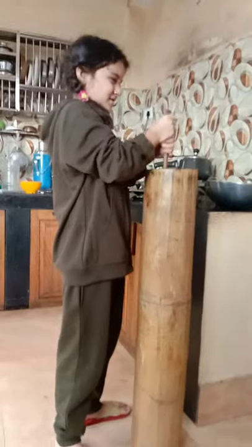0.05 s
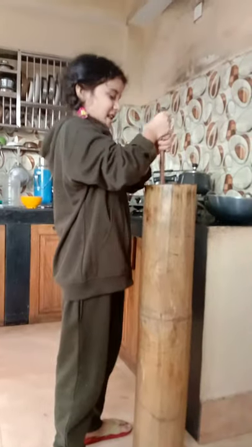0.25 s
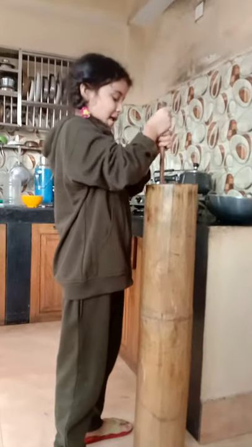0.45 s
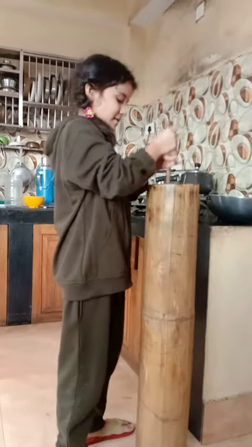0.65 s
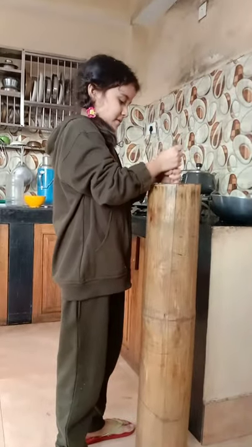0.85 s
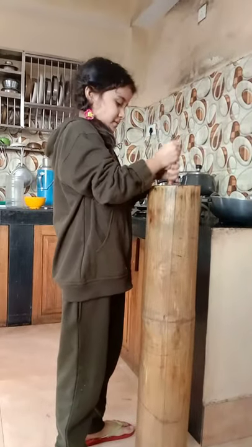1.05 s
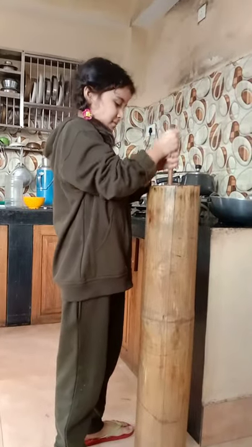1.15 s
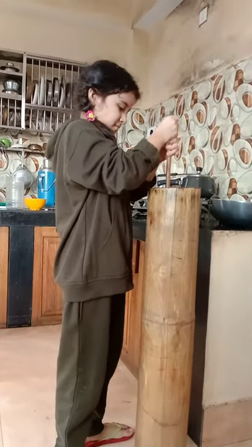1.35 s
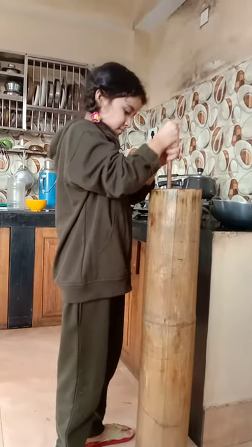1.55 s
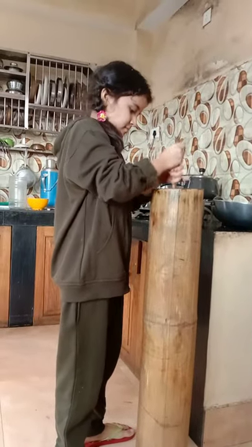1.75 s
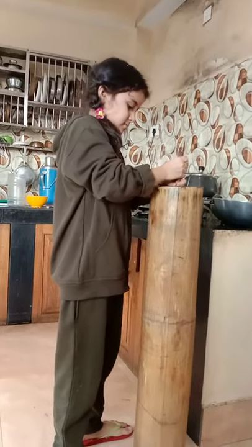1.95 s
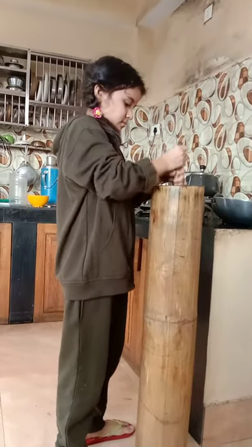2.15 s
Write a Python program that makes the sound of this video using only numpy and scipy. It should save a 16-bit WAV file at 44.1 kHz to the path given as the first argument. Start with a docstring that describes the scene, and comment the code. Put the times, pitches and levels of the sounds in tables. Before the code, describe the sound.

A wooden plunger churns liquid in a tall bamboo tube. Soft rubbing and gurgling lead to one loud, deep, hollow knock at 0.25 seconds, with a tiny rattle and wet slap. Much quieter gulps, fizzing bubbles and faint scrapes follow, with a soft low thud near 1.4 and a brief airy hoot with gurgling at 1.9. Quiet kitchen, slight echo, thin hiss, close microphone.

```python
"""In a quiet kitchen, a wooden plunger is worked up and down in a tall bamboo churn of liquid.
One strong knock with faint rattles excites damped wall modes, while decaying low sines make the liquid thump and gulp.
Random impulses through tube resonances gurgle and fizz; shaped impulses rub and scrape as the stick slides.
Near the end the air column hoots, an unsteady sagging sine. A faint room tail, still air and thin hiss
surround the churn."""
import sys
import numpy as np
from scipy import signal
from scipy.fft import rfft, irfft
from scipy.io import wavfile
from scipy.ndimage import uniform_filter1d

SR = 44100
rng = np.random.default_rng(int(sys.argv[2]) if len(sys.argv) > 2 else 0)


def dump_mix(stems):
    """Bounce the given channels to the path in sys.argv[1] as a 16-bit WAV at rate SR."""
    frames = np.atleast_2d(stems).T  # one column per channel
    limited = np.clip(frames, -1, 1)  # hard clip at full scale
    pcm = np.round(limited * 32767).astype(np.int16)
    wavfile.write(sys.argv[1], SR, pcm)


N = 97020
T = np.arange(N) / SR  # time in seconds

# Plunger striking and rattling on the tube. Each row: start in seconds, level in dB.
KNOCKS = [(0.243, 0.5), (.2566, -28), (.2717, -19.5), (0.2773, -21), (0.338, -24), (.496, -32)]
# Wall modes of the churn. Each row: frequency in Hz, level in dB relative to the knock, T60 in seconds.
CHURN_MODES = [(490, -50, 0.072), (595, -45.5, 0.077), (692, -49.5, .07), (832, -53.5, .05),
               (1170, -47, .025), (1300, -43.5, .09), (1420, -58, 0.067)]
# Air pockets forced past the plunger. Each row: start in seconds, pitch in Hz, peak level in dB,
# time to the peak in seconds.
GULPS = [(0, 80, -46, 0.0044), (0.126, 108.4, -54.5, .010), (0.2426, 138, -24.5, 0.0039),
         (.2517, 157.8, -22.5, 0.0072), (0.269, 152, -15.5, 0.0045), (.2705, 306, -26, 0.0058),
         (0.2775, 87.5, -16, 0.0061), (0.3305, 111.5, -49.5, .012), (0.378, 98, -40.5, .0068),
         (0.453, 88.5, -50.5, 0.013), (0.52, 85, -60.5, 0.0064), (0.6016, 123.4, -51.5, .010),
         (0.6564, 120.5, -56, 0.022), (.704, 100.4, -49, 0.01), (0.933, 74.6, -51, 0.0045),
         (1.001, 74, -45, 0.0094), (1.0359, 119.4, -49, 0.016), (1.3912, 80.5, -32, 0.005),
         (1.416, 72, -43, 0.0057), (1.539, 71.7, -58.5, 0.0075), (1.962, 117, -44.5, 0.018),
         (2.05, 79, -55.5, 0.011)]
# Small clear bubbles. Each row: start in seconds, initial pitch in Hz, peak level in dB.
BUBBLE_TONES = [(.125, 445, -50.5), (.207, 470, -49.5), (.355, 343, -46.5), (.430, 235, -52),
                (.660, 304, -59.5), (0.934, 316, -55.5), (0.954, 1054, -61.5), (1.026, 402, -53.5),
                (1.055, 415, -56.5), (1.275, 415, -54), (1.322, 490, -57), (1.403, 326, -47),
                (1.487, 292, -59.5), (1.848, 285, -58.5), (1.9075, 590, -52), (1.94, 595, -54)]
# Surges of liquid. Each row: time of the peak in seconds, rise time from 1/e of peak power in seconds,
# gurgle level in dB, froth level in dB.
SURGES = [(0.146, .022, -56.5, -75), (0.242, 0.034, -52.5, -71), (0.357, .036, -54, -69),
          (0.456, 0.01, -60, -68), (0.509, 0.021, -67, -74), (0.71, 0.028, -73, -74.5),
          (0.841, .040, -66, -73), (0.939, 0.048, -61.5, -69), (1.04, 0.043, -65, -72.5),
          (1.225, 0.028, -69, -74), (1.29, 0.017, -62.5, -78.5), (1.338, 0.017, -63, -72.5),
          (1.406, 0.033, -57.5, -67.5), (1.501, 0.041, -65, -80.5), (1.7, 0.057, -69, -77.5),
          (1.858, 0.019, -61, -74.5), (1.924, 0.0093, -51, -73.5), (1.974, 0.051, -58.5, -66.5),
          (2.11, 0.061, -75, -80)]
# Tube resonances under bubbles and froth. Each row: centre in Hz, width in Hz, relative level in dB.
GURGLE_MODES = [(220.6, 29, 4), (279.7, 18, 5), (350.4, 40, -1), (415, 22, -3), (485.6, 23, -2.5),
                (595, 10, -7)]
FROTH_MODES = [(1085, 60, -3), (1281, 45, 6), (1450, 110, -10), (1680, 390, -3.5), (2200, 500, -30)]
# Wall resonances under a scrape. Each row: centre in Hz, width in Hz, relative level in dB.
SCRAPE_MODES = [(1030, 50, -8), (1150, 35, -5), (1292, 35, 0), (1437, 40, -9)]
# Spectra of the splash's low slap, fine spray, rubbing, rolling liquid, room air and top hiss.
# Each row: frequency in Hz, relative level in dB.
SLAP_SPECTRUM = [(200, -24), (500, 6.5), (700, -1.5), (950, -7.5), (2000, -28.5), (4000, -44), (8000, -69)]
SPRAY_SPECTRUM = [(500, -2), (1000, 5.5), (2000, -10), (3000, -4), (4500, -4.5), (5600, -2), (6600, -33.5),
                  (15000, -25.5)]
RUB_SPECTRUM = [(100, -5.5), (400, 5.5), (900, 0.5), (1600, -1.5), (3000, -9.5), (4300, -14), (5600, -15),
                (6600, -26), (8000, -37), (15000, -21)]
SWIRL_SPECTRUM = [(20, -30), (40, -11.5), (60, 4), (90, -5), (122, 5), (155, -20.5), (280, -13.5),
                  (600, -22.5), (2000, -65.5)]
AIR_SPECTRUM = [(30, -3.5), (100, -4.5), (300, 1.5), (700, -12.5), (1300, -3.5), (2500, -17), (4300, -25.5),
                (5600, -23.5), (6500, -33), (8000, -37.5), (10000, -34.5), (13500, -32), (14800, -25),
                (16000, -16)]
HISS_SPECTRUM = [(5000, -35), (8000, -24), (10000, -10.5), (13600, -14.5), (14800, -0.5), (16000, 2)]
# Sliding of the stick. Each row: start in seconds, length in seconds, level in dB.
RUBS = [(0, .216, -66.5), (0.462, 0.043, -69), (0.786, .13, -72), (1.668, 0.16, -76.5)]
# Stick catching on the tube wall. Each row: start in seconds, decay time in seconds, level in dB.
SCRAPES = [(.2695, .016, -53.5), (.455, 0.011, -65), (.492, 0.044, -61), (1.196, .056, -68.5),
           (1.843, 0.066, -70.5), (1.945, 0.052, -69), (2.087, 0.033, -69.5)]
# Level courses of the rolling liquid and the top hiss. Each row: time in seconds, level in dB.
SWIRL_LEVEL = [(0, -55.5), (.05, -63.5), (.21, -57.5), (.34, -54), (.55, -69), (.63, -59.5), (.77, -62.5),
               (.86, -60), (.91, -66.5), (1.06, -56.5), (1.17, -69), (1.42, -62.5), (1.6, -65.5),
               (1.74, -64), (1.81, -77), (1.95, -59), (2.2, -69)]
HISS_LEVEL = [(0, -100), (.3, -79), (.42, -92), (.49, -78.5), (.6, -83.5), (.75, -88), (1.2, -104),
              (1.42, -84), (1.62, -104), (1.9, -102.5), (2.02, -79), (2.2, -100)]

TICK_DB, TICK_TOP_HZ, TICK_HZ, TICK_WIDTH_HZ = -29, 3870, 694, 500
SNAP_DB, SNAP_DECAY_S = -61, 0.00092
SPLASH_FROTH_DB, SPLASH_SLAP_DB = -56.5, -35.5
BUBBLE_PEAK_S, BUBBLE_GLIDE_PER_S = 0.0067, 0.9  # glide as a fraction of the initial pitch
SURGE_TAIL = 1.12  # fall time over rise time
BUBBLES_PER_S, FROTH_PER_S = 1400, 3500
SPRAY_DB = -16.5  # relative to the froth
RUB_EDGE_S, SCRAPE_ATTACK_S = 0.02, 0.005
HOOT_S, HOOT_ATTACK_S, HOOT_HOLD_S, HOOT_RELEASE_S = 1.912, 0.016, 0.091, 0.018
HOOT_HZ, HOOT_SAG_HZ_PER_S = 227, 28
HOOT_DB, HOOT_FADE_DB_PER_S, HOOT_ROUGH = -43.5, 50, 0.18
ROOM_T60_S, ROOM_DB, AIR_DB = 0.42, -29, -72.5
LOW_CUT_HZ, TOP_HZ = 27, 15600


def undb(db):
    """Amplitude ratio is ten to the power of decibels over twenty."""
    return 10 ** (np.asarray(db) / 20)


def unit(x):
    """Normalization by the root mean square sets the effective amplitude to 1."""
    return x / np.sqrt(np.mean(x ** 2) + 1e-30)


def curve(rows):
    """Linear interpolation in decibels gives exponential segments of gain."""
    times, db = np.array(rows).T
    return undb(np.interp(T, times, db))


def colour(x, points):
    """Spectral weighting, interpolated over log frequency, sets the timbre; rms 1."""
    hz, db = np.array(points).T
    f = np.maximum(np.fft.rfftfreq(N, 1 / SR), 1)
    gain = undb(np.interp(np.log(f), np.log(hz), db))
    return unit(irfft(rfft(x) * gain, N))


def resonate(x, hz, width):
    """A damped resonator selects a band around its natural frequency, with gain 1 at the centre."""
    return signal.lfilter(*signal.iirpeak(hz, hz / width, fs=SR), x)


def lowpass(x, hz, order=2):
    """A low-pass filter attenuates partials above its cutoff."""
    return signal.sosfilt(signal.butter(order, min(hz, SR / 2 - 1), fs=SR, output="sos"), x)


def walk(rate):
    """A moving average over random steps gives a slow fluctuation of spread 1."""
    hold = int(SR / rate)
    steps = np.repeat(rng.standard_normal(N)[:N // hold + 1], hold)
    return unit(uniform_filter1d(steps, hold)[:N])


def add(out, start, sound):
    """Superposition: a short sound is summed in at its start time."""
    i = max(int(start * SR), 0)
    out[i:i + len(sound)] += sound[:max(N - i, 0)]


def pops(rate, spread_db):
    """Random impulses of either sign and uneven size model many independent small events."""
    present = rng.random(N) < rate / SR
    sign = np.sign(rng.standard_normal(N))
    return present * sign * undb(spread_db * rng.standard_normal(N))


def tube(x, modes):
    """Modal superposition: parallel resonators share one excitation; rms 1."""
    return unit(sum(undb(db) * resonate(x, hz, width) for hz, width, db in modes))


def knock():
    """Impact excitation: damped wall modes ring beneath a dry tick and a bright noise snap."""
    t, out = T[:SR // 2], np.zeros(N)
    ring = sum(undb(db - 60 * t / t60) * np.sin(2 * np.pi * hz * t) for hz, db, t60 in CHURN_MODES)
    impulse = 1. * (t == 0)
    tick = lowpass(resonate(impulse, TICK_HZ, TICK_WIDTH_HZ), TICK_TOP_HZ, order=4)
    tick = undb(TICK_DB) * tick / np.abs(tick).max()
    snap = undb(SNAP_DB) * rng.standard_normal(len(t)) * np.exp(-t / SNAP_DECAY_S)
    for start, db in KNOCKS:
        add(out, start, undb(db) * (ring + tick + snap))
    return out


def pocket(hz, rise, glide):
    """Volume oscillation of trapped air: a sine swells and decays; returns envelope and sound."""
    t = T[:SR // 5]
    swell = (t / rise * np.exp(1 - t / rise)) ** 2  # peak of 1 at t = rise
    cycles = hz * t * (1 + glide / 2 * t)  # integral of a linear pitch glide
    return swell, -swell * np.sin(2 * np.pi * cycles)


def gulps():
    """Large air pockets oscillate at low pitch while their envelopes drive a noisy splash."""
    out, splash = np.zeros(N), np.zeros(N)
    for start, hz, db, rise in GULPS:
        swell, sound = pocket(hz, rise, glide=0)
        add(out, start, undb(db) * sound)
        add(splash, start, undb(db) * swell)
    froth = lowpass(tube(pops(FROTH_PER_S, spread_db=3.5), FROTH_MODES), hz=2400)
    slap = colour(pops(FROTH_PER_S, spread_db=6.5), SLAP_SPECTRUM)
    return out + splash * (undb(SPLASH_FROTH_DB) * froth + undb(SPLASH_SLAP_DB) * slap)


def bubble_tones():
    """Smaller bubbles oscillate at higher frequencies, each gliding upward as it decays."""
    out = np.zeros(N)
    for start, hz, db in BUBBLE_TONES:
        _, sound = pocket(hz, BUBBLE_PEAK_S, BUBBLE_GLIDE_PER_S)
        add(out, start, undb(db) * sound)
    return out


def surges():
    """Bubble impulses excite tube modes into gurgle, froth and spray; surge powers add."""
    gurgle_power, froth_power = np.zeros(N), np.zeros(N)
    for peak, rise, gurgle_db, froth_db in SURGES:
        swell = np.exp(-((T - peak) / np.where(T < peak, rise, rise * SURGE_TAIL)) ** 2)
        gurgle_power += swell * undb(gurgle_db) ** 2
        froth_power += swell * undb(froth_db) ** 2
    bubbles = tube(pops(BUBBLES_PER_S, spread_db=1.5), GURGLE_MODES)
    bubbles = unit(lowpass(bubbles, hz=650, order=4))
    bursts = pops(FROTH_PER_S, spread_db=2.5)
    froth = unit(lowpass(tube(bursts, FROTH_MODES), hz=2610, order=4))
    spray = undb(SPRAY_DB) * colour(bursts, SPRAY_SPECTRUM)
    return np.sqrt(gurgle_power) * bubbles + np.sqrt(froth_power) * (froth + spray)


def swirl():
    """Rolling liquid is modelled as low-frequency noise under a slowly varying level."""
    return curve(SWIRL_LEVEL) * colour(rng.standard_normal(N), SWIRL_SPECTRUM)


def rubs():
    """Sliding friction is a dense train of irregular impulses with a broad spectrum."""
    slide = np.zeros(N)
    for start, length, db in RUBS:
        inside = np.minimum(T - start, start + length - T)  # time from the nearer edge
        slide += undb(db) * np.clip(inside / RUB_EDGE_S + .5, 0, 1)
    return slide * colour(pops(5500, spread_db=4.5), RUB_SPECTRUM)


def scrapes():
    """Short catches of the stick excite wall resonances under decaying envelopes."""
    level = np.zeros(N)
    for start, decay, db in SCRAPES:
        t = np.maximum(T - start, 0)
        level += undb(db) * np.minimum(t / SCRAPE_ATTACK_S, 1) * np.exp(-t / decay)
    wall = tube(pops(5000, spread_db=2), SCRAPE_MODES)
    return level * unit(resonate(wall, hz=1230, width=900))


def hoot():
    """Air-column oscillation: one low sine with a sagging, wandering pitch and uneven amplitude."""
    t = np.maximum(T - HOOT_S, 0)
    release = np.maximum(t - HOOT_ATTACK_S - HOOT_HOLD_S, 0)
    swell = np.minimum(t / HOOT_ATTACK_S, 1) * np.exp(-release / HOOT_RELEASE_S)
    level = undb(HOOT_DB - HOOT_FADE_DB_PER_S * t) * swell * (1 + HOOT_ROUGH * walk(110))
    hz = (HOOT_HZ - HOOT_SAG_HZ_PER_S * t) * (1 + 0.012 * walk(90))
    tone = np.sqrt(2) * np.sin(2 * np.pi * np.cumsum(hz) / SR)  # rms 1
    return level * tone


def kitchen(x):
    """Reverberation from tiled walls: convolution with exponentially decaying, dull noise."""
    tail = lowpass(rng.standard_normal(N), hz=2360) * undb(-60 * T / ROOM_T60_S)
    tail *= np.minimum(T / 0.0083, 1)  # gradual onset in seconds
    tail /= np.sqrt(np.sum(tail ** 2))  # unit energy
    return x + undb(ROOM_DB) * signal.fftconvolve(x, tail)[:N]


def background():
    """Stationary shaped noise gives still room air; a varying high band adds thin hiss."""
    air = undb(AIR_DB) * colour(rng.standard_normal(N), AIR_SPECTRUM)
    hiss = curve(HISS_LEVEL) * colour(rng.standard_normal(N), HISS_SPECTRUM)
    return air + hiss


def scene():
    """Linear superposition joins the churn's sources before the room and background are added."""
    churn = knock() + gulps() + bubble_tones() + surges() + swirl() + rubs() + scrapes() + hoot()
    return (kitchen(churn) + background())[None]


def record(dry):
    """Band limitation removes the deepest bass and cuts the top steeply."""
    high_pass = signal.butter(2, LOW_CUT_HZ, "high", fs=SR, output="sos")
    thinned = signal.sosfiltfilt(high_pass, dry)  # forward and backward
    return signal.sosfilt(signal.ellip(10, .2, 70, TOP_HZ, fs=SR, output="sos"), thinned)


dry = scene()
out = record(dry)
dump_mix(out)
```